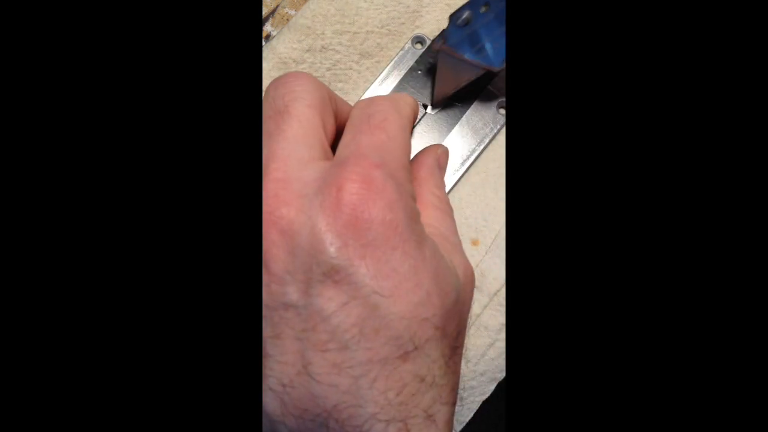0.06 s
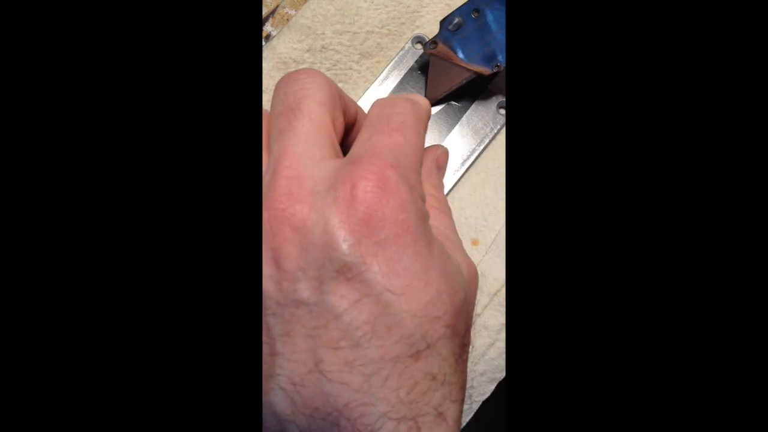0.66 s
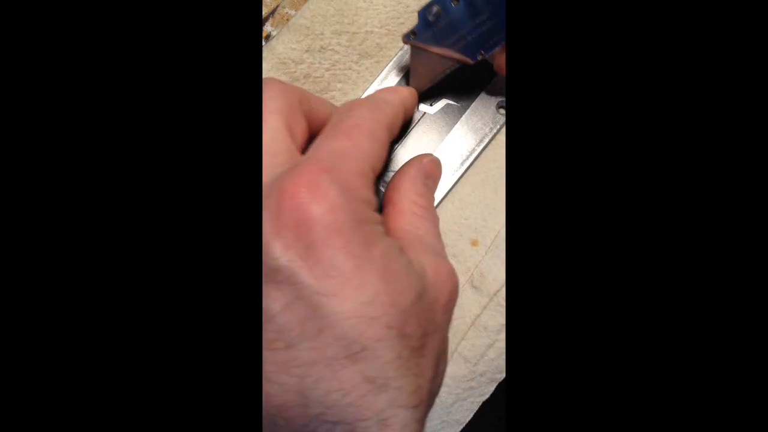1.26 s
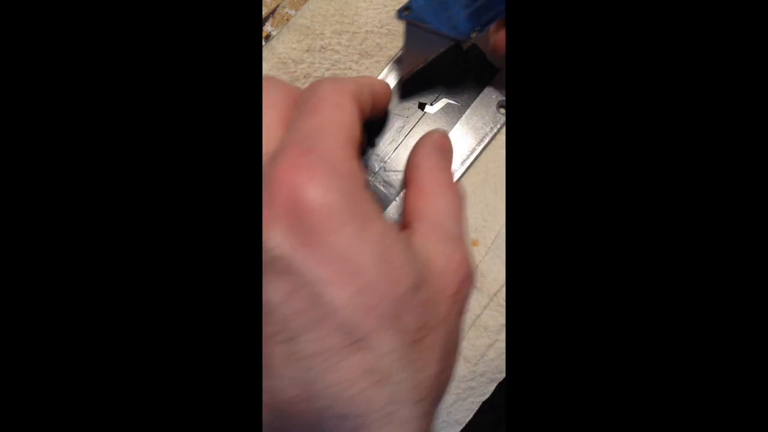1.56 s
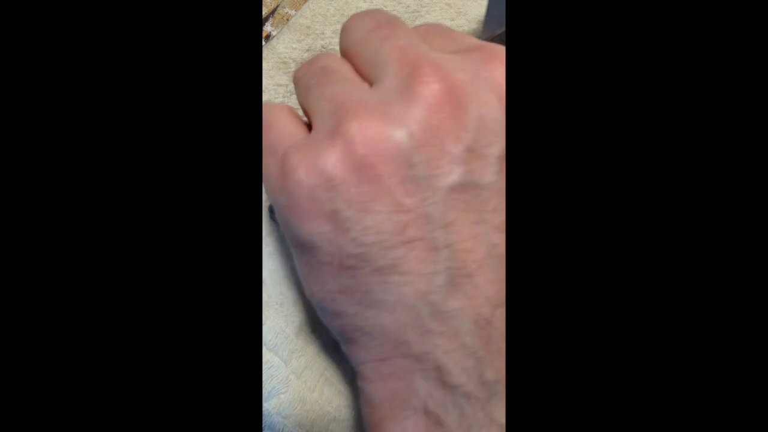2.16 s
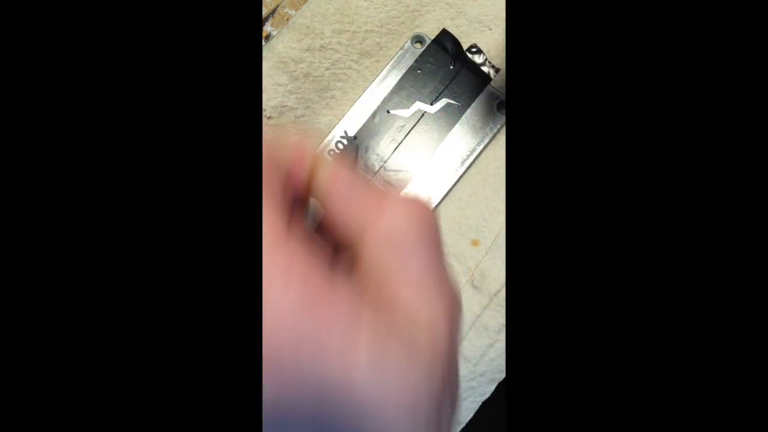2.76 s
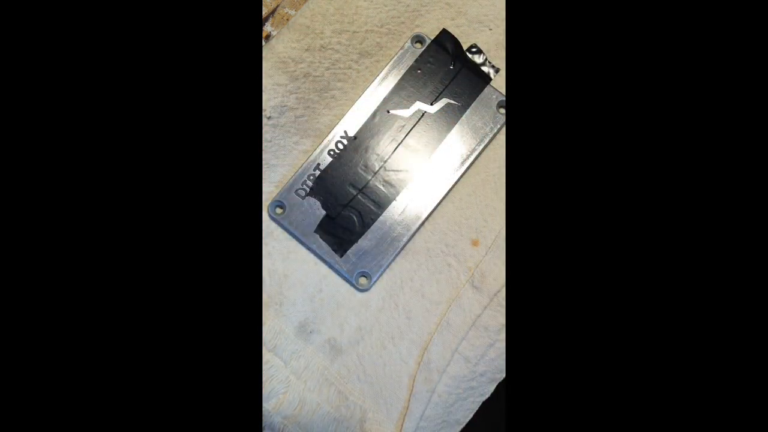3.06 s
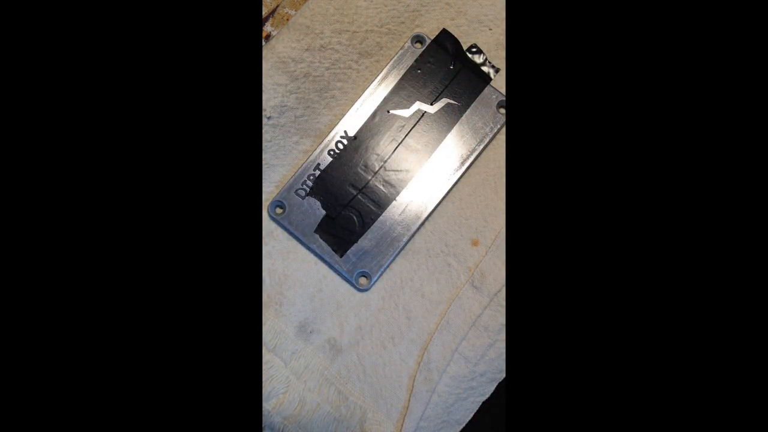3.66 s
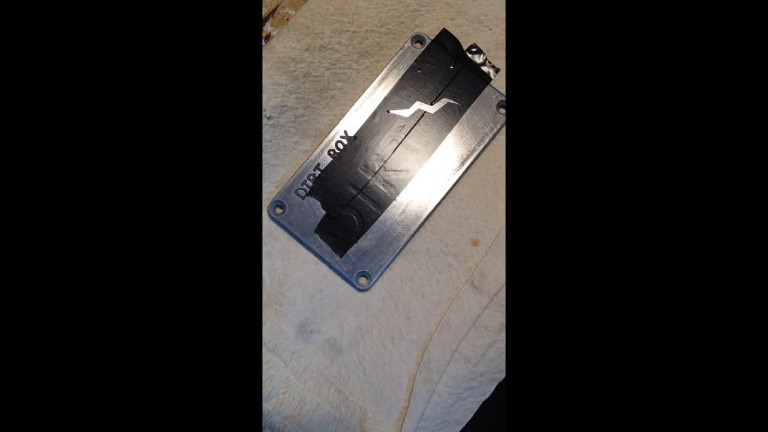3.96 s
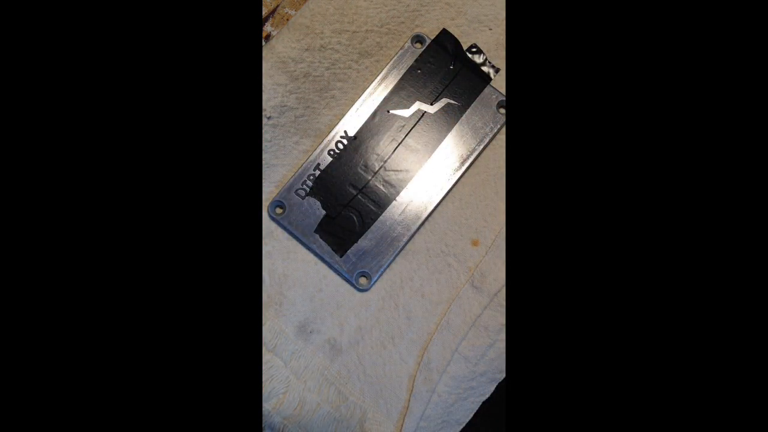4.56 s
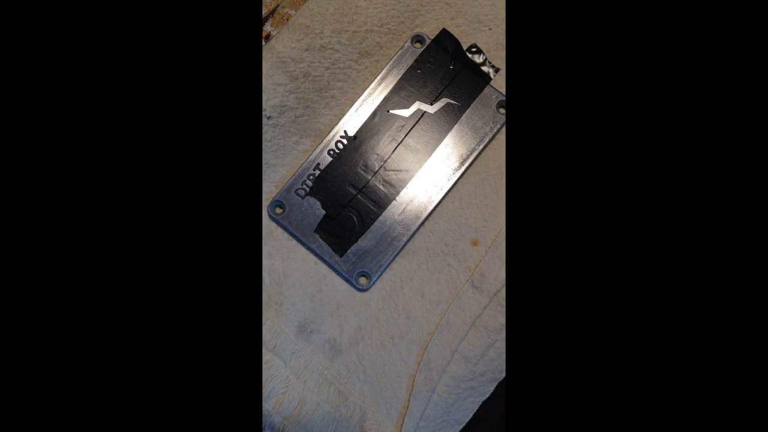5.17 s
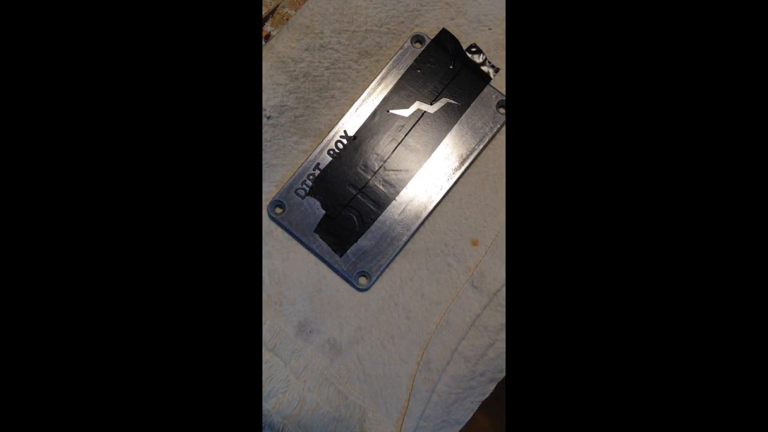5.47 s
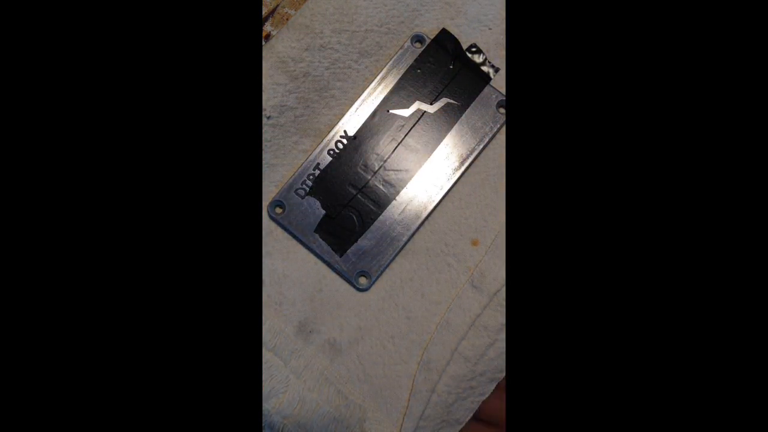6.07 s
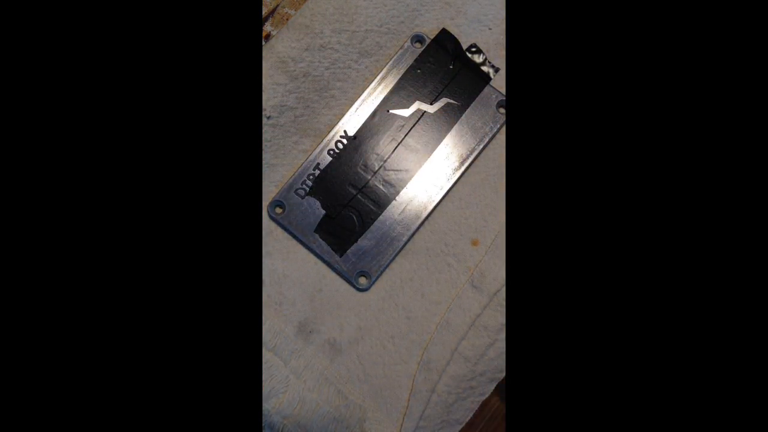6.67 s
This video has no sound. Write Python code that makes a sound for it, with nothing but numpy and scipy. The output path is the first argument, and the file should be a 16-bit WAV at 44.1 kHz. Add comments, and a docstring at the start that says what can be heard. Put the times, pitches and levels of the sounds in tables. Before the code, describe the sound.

A blade faintly nicks tape on a metal plate, then tools clack onto a wooden bench before a close rub and a loud bump.

```python
"""A wooden bench in a quiet room, the microphone of a phone close to the work.
A craft blade nicks tape on a small metal plate, which rings under light taps and scrapes.
Tools clack down, their handles ringing over the thud of the bench. Then comes close handling
at the microphone: a stick-slip rub, a thin squeal, a bump, a short rasp and a faint crackle.
Low room rumble and a wavering drone lie underneath."""
import sys
import numpy as np
from scipy import signal
from scipy.fft import rfft, irfft
from scipy.io import wavfile

SR = 44100
rng = np.random.default_rng(int(sys.argv[2]) if len(sys.argv) > 2 else 0)


def store_pcm(level_fs):
    """Save levels as 16-bit WAV."""
    pcm = np.round(np.clip(level_fs, -1, 1) * 32767).astype(np.int16)
    wavfile.write(sys.argv[1], SR, np.atleast_2d(pcm).T)


N = 300321
TIME = np.arange(N) / SR
AGE = TIME[:SR // 2]  # seconds since a blow

# Spectra of a bright tick, its duller body, a hard crack and a wooden clack.
# Each row: frequency in Hz, level in dB.
TICK_COLOUR = [(1500, -23), (2300, -7), (3200, -8), (5000, -0.5), (6800, -1), (9000, -9), (12500, -5.5),
               (15500, -14.5)]
BODY_COLOUR = [(250, 0.5), (500, -1), (900, -6), (1800, -1), (2800, -11), (5000, -12.5)]
CRACK_COLOUR = [(1000, -23), (2000, 0), (3500, -7), (5000, -0.5), (6500, 1.5), (8500, -5.5), (12000, -11),
                (15500, -11)]
CLACK_COLOUR = [(200, -13), (420, 0.5), (600, 2), (850, 1.5), (1300, -9), (1800, -19.5), (2800, -20)]
# Modes of a steel tool, and of what is bumped close to the microphone.
# Each row: frequency in Hz, level in dB, t60 in seconds.
STEEL_MODES = [(3250, -13, .04), (4860, 0, .042), (5130, -3, .038), (6140, -8, .03), (6850, -2, .034),
               (7120, -6, .036), (9930, -6, .038)]
BUMP_MODES = [(77, -12.5, .22), (123, -12, .17), (199, -9.5, .12), (310, -9, .045), (370, 0, .045),
              (516, -10, .05), (560, -12, .05), (856, -14, .032), (1357, -23, .04)]


def undb(db):
    """Decibels to gain."""
    return 10 ** (np.asarray(db) / 20)


def unit(x):
    """Scale to rms 1."""
    return x / np.sqrt(np.mean(x ** 2))


def add(out, start_s, sound):
    """Mix a sound in at start_s."""
    start = int(start_s * SR)
    out[start:start + len(sound)] += sound[:N - start]


def colour(x, points):
    """Shape x by (Hz, dB) points, falling 30 dB an octave past their ends; rms 1."""
    hz, db = np.transpose(points)
    octave = np.log2(np.maximum(np.fft.rfftfreq(len(x), 1 / SR), 1))
    knots = np.log2(hz)
    outside = np.abs(octave - np.clip(octave, knots[0], knots[-1]))
    gain = undb(np.interp(octave, knots, db) - 30 * outside)
    return unit(irfft(rfft(x) * gain, len(x)))


def walk(rate):
    """Random wander through rate points a second, with a spread near 1."""
    return np.interp(TIME * rate, np.arange(8192), rng.standard_normal(8192))


def decay(t60, hold=0):
    """Steady for hold seconds, then a fall of 60 dB in t60 seconds."""
    return np.exp(-np.log(1000) * np.maximum(AGE - hold, 0) / t60)


def ring(modes, scatter_db=1.5):
    """Damped modes after one blow; their weights change with the spot that is struck."""
    hz, db, t60 = np.transpose(modes)
    weights = undb(db + scatter_db * rng.standard_normal(len(hz))) * (-1) ** np.arange(len(hz))
    partials = (a * np.sin(2 * np.pi * f * AGE) * decay(t) for f, a, t in zip(hz, weights, t60))
    return sum(partials) / np.linalg.norm(weights)


def resonate(x, modes):
    """Drive a set of modes with x; rms 1."""
    return unit(signal.fftconvolve(x, ring(modes, scatter_db=0))[:N])


def burst(points, t60, rise=0.00067, hold=0):
    """A crowd of short-lived resonances, heard as a dying puff of noise."""
    return colour(rng.standard_normal(len(AGE)), points) * decay(t60, hold) * np.clip(AGE / rise, 0, 1)


def friction(rate, spread_db, patchy_db):
    """Tiny stick-slip releases, about rate a second, uneven in size and coming in patches."""
    slips = (rng.random(N) < rate / SR) * rng.choice([-1, 1], N)
    size_db = spread_db * np.minimum(rng.exponential(size=N), 4)
    return unit(slips * undb(size_db + patchy_db * walk(90)))


def stroke(peak_s, db, rise_s, fall_s):
    """Gain of one hand movement: a bell that climbs 20 dB in rise_s and loses it again in fall_s."""
    away = (TIME - peak_s) / np.where(TIME < peak_s, rise_s, fall_s)
    return undb(db - 20 * np.minimum(away ** 2, 9))


def strokes(rows):
    """Gain of a series of hand movements."""
    return sum(stroke(*row) for row in rows)


def room_tone():
    """Room rumble with a low, wavering drone."""
    # Spectrum of the still room. Each row: frequency in Hz, level in dB.
    air_colour = [(25, -27.5), (59, -10), (119, -7), (200, -16), (274, -16), (310, -22), (389, -22),
                  (582, -31), (1570, -39), (3260, -44.5), (15500, -51)]
    drone_hz = 120
    rumble = colour(rng.standard_normal(N), air_colour) * undb(-61.5 + 0.4 * walk(16))
    drone = undb(-64.5 + 1.7 * walk(7.1)) * np.sin(2 * np.pi * drone_hz * TIME)
    return rumble + drone


def room(x):
    """At close range the small room adds only a weak, duller tail; the low middle lingers longest."""
    tail = burst([(80, 11), (600, -1.5), (2500, -2), (15000, -13)], t60=0.15, rise=0.016)
    boom = burst([(200, -9.5), (400, 0.5), (600, -10), (1500, -16.5)], t60=0.4, rise=0.016)
    echo = undb(-22) * tail / np.linalg.norm(tail) + undb(-40) * boom / np.linalg.norm(boom)
    return x + signal.fftconvolve(x, echo)[:N]


def sliding():
    """Light sliding contact gives a faint, fine hiss; each stroke has its own brightness."""
    # Each row: peak time in seconds, level in dB, rise and fall in seconds, relative treble in dB.
    slides = [(1.17, -81, .2, 0.51, 5), (3.1, -74.5, .2, 0.059, 6), (3.187, -71.5, 0.057, 0.091, 6.5),
              (3.4, -69.5, 0.092, 0.15, 5.5), (3.6, -57, 0.11, 0.11, -13.5), (4.1, -66, .14, 0.074, -1),
              (4.25, -66, .1, 0.3, -7.5), (5.02, -70, .1, 0.25, -7)]
    # Spectrum of the hiss. Each row: frequency in Hz, level in dB.
    hiss_colour = [(700, -8), (1800, 2.5), (3000, -4.5), (5800, -1.5), (9000, -5.5), (13000, -4),
                   (15500, -4.5)]
    hiss = colour(friction(rate=13000, spread_db=3.5, patchy_db=3), hiss_colour)
    dull = signal.sosfiltfilt(signal.butter(2, 7000, fs=SR, output="sos"), hiss)
    return sum(stroke(*shape) * (dull + undb(treble_db) * (hiss - dull)) for *shape, treble_db in slides)


def rustle():
    """The last soft strokes of handling crackle faintly."""
    # Each row: peak time in seconds, level in dB, rise and fall in seconds.
    rustles = [(6.113, -58.5, 0.0088, .04), (6.153, -57.5, 0.019, 0.035), (6.252, -58.5, 0.04, 0.041),
               (6.365, -66.5, 0.098, 0.056), (6.63, -67, 0.28, .25)]
    # Spectrum of the rustle. Each row: frequency in Hz, level in dB.
    rustle_colour = [(290, -7), (500, -5), (997, -1), (1820, -6.5), (4020, -13.5), (15500, -16)]
    return strokes(rustles) * colour(friction(rate=12000, spread_db=5, patchy_db=3), rustle_colour)


def handle_clicks():
    """A hollow handle clicks as it is gripped."""
    # Each row: start in seconds, level in dB, relative level of the low modes in dB.
    clicks = [(3.7244, -38.5, -22), (3.988, -35, -0.5), (3.9948, -35.5, -12.5)]
    # Modes of the shell. Each row: frequency in Hz, level in dB, t60 in seconds.
    low_modes = [(1755, 0, .018), (2480, -6, .02), (4350, 0, .02)]
    high_modes = [(6050, -0.5, 0.014), (7300, -0.5, 0.025), (7900, -0.5, .02), (10220, -1, 0.023),
                  (12450, 3, 0.015)]
    out = np.zeros(N)
    for start, db, low_db in clicks:
        shell = ring(high_modes) + undb(low_db) * ring(low_modes)
        contact = undb(-6.5) * burst(TICK_COLOUR, t60=0.04)
        add(out, start, undb(db - 2.5) * (shell + contact))
    return out


def steel_rattle():
    """A steel tool rocks and chatters as it settles."""
    # Each row: start in seconds, level in dB.
    rattles = [(4.137, -45), (4.3745, -42), (4.3815, -46), (4.3855, -35.5)]
    out = np.zeros(N)
    for start, db in rattles:
        chink = ring(STEEL_MODES, scatter_db=3) + undb(-9) * burst(TICK_COLOUR, t60=0.015)
        add(out, start, undb(db - 4) * chink)
    return out


def tool_skid():
    """A tool skids on the wood and judders, drawing a brief note."""
    # Each row: peak time in seconds, level in dB, rise and fall in seconds.
    skids = [(3.598, -48.5, 0.097, 0.089)]
    judders = [(3.606, -46.5, .008, .012), (3.622, -44.5, 0.013, 0.021)]
    # Spectrum of the skid. Each row: frequency in Hz, level in dB.
    skid_colour = [(300, -25), (900, -21.5), (1500, -25.5), (3220, -27.5), (4470, -28.5), (5400, -31.5),
                   (15000, -46.5)]
    # The judder's note. Each row: frequency in Hz, level in dB, t60 in seconds.
    judder_modes = [(792, 8.5, 0.082), (898, 9.5, 0.051), (1195, 4, .03)]
    slips = friction(rate=4800, spread_db=4, patchy_db=0)
    return strokes(skids) * colour(slips, skid_colour) + strokes(judders) * resonate(slips, judder_modes)


def blow(crack_db, thud_db, clack_db, ring_db, pitch=1, clack_pitch=1):
    """A hard contact cracks, the metal handle rings, and the bench answers with a clack and a thud."""
    # Each row: frequency in Hz, level in dB, t60 in seconds.
    bench_modes = [(122, 2, .17), (199, -1.5, .13), (242, -6, .09), (304, -6, .08), (422, -10, .078),
                   (535, -7, .09), (655, -11, .06), (812, -14, .07)]
    handle_modes = [(2080, -6, .03), (2260, -4, .03), (2603, 0, .038), (4240, -6, .028), (4540, -3, .027),
                    (4848, 6, .019), (5160, -2, .022), (5820, -1, .02), (6150, -2, .02), (8570, -11, .02),
                    (12200, -4, .01)]
    # the first instant of contact is the brightest
    edge = undb(0.5) * burst(TICK_COLOUR, t60=0.0047, rise=0.00016)
    crack = edge + undb(-1.5) * burst(CRACK_COLOUR, t60=0.049)
    handle = ring(np.array(handle_modes) * [pitch, 1, 1])
    tool = undb(crack_db) * crack + undb(ring_db + 1.5) * handle
    # a higher-pitched clack dies away sooner
    clack = burst(np.array(CLACK_COLOUR) * [clack_pitch, 1], t60=0.058 / clack_pitch)
    # the heavy bench takes a few milliseconds to get moving
    thud = ring(bench_modes) * np.clip(AGE / 0.0039, 0, 1)
    return tool + undb(clack_db) * clack + undb(thud_db) * thud


def landing_snap():
    """The bright snap of a tool falling flat."""
    # Each row: frequency in Hz, level in dB.
    snap_colour = [(2000, -13.5), (4800, 0), (7000, 0), (9000, -3.5), (12000, 0), (15500, -9)]
    return burst(snap_colour, t60=0.011, rise=0.0002)


def tool_knocks():
    """Light knocks on the bench are single blows; a dropped tool lands on end, falls flat and rebounds."""
    # Each row: start in seconds, crack, thud and clack in dB, pitch ratio of the clack.
    knocks = [(3.2513, -75, -55, -51, 1.17), (3.4982, -58, -50.5, -53, 1.8),
              (3.8145, -44, -39.5, -41.5, 0.91), (4.1288, -70, -52, -39, 0.73),
              (4.331, -60, -40.5, -50, 0.54), (4.373, -52, -35, -32.5, 1.25),
              (4.534, -58.5, -46, -54.5, 0.86), (4.569, -63, -44, -54.5, 0.84),
              (5.034, -71.5, -47.5, -56, 1.3)]
    # Each row: main blow in seconds; crack, thud, clack, ring and bright snap in dB;
    # lead of the first touch in seconds, its crack in dB; pitch ratio of the ring.
    drops = [(3.5439, -27.5, -26.5, -40, -25, -28.5, 0.0052, -25, 1.36),
             (4.1485, -31, -26.5, -29.5, -14, -20, .0128, -46, 1)]
    light_ring_db, touch_bench_db = -9, -2.5
    rebound_s, rebound_tool_db, rebound_bench_db = 0.0116, -11.5, -9.5
    out = np.zeros(N)
    for start, crack, thud, clack, clack_pitch in knocks:
        add(out, start, blow(crack, thud, clack, crack + light_ring_db, clack_pitch=clack_pitch))
    for start, crack, thud, clack, ring_db, snap_db, lead_s, touch, pitch in drops:
        first = blow(touch, thud + touch_bench_db, clack + touch_bench_db, touch + light_ring_db, pitch)
        landing = blow(crack, thud, clack, ring_db, pitch) + undb(snap_db) * landing_snap()
        rebound = blow(crack + rebound_tool_db, thud + rebound_bench_db, clack + rebound_bench_db,
                       ring_db + rebound_tool_db, pitch)
        add(out, start - lead_s, first)
        add(out, start, landing)
        add(out, start + rebound_s, rebound)
    return out


def close_rub():
    """A long rub at the microphone ends in short pushes: friction hisses and catches over a rumble."""
    # Each row: peak time in seconds, friction and rumble in dB, rise and fall in seconds.
    pushes = [(5.375, -43, -35, 0.25, 0.35), (5.428, -56, -34, 0.034, 0.035),
              (5.455, -51, -46.5, 0.02, 0.019), (5.592, -48.5, -32, 0.063, 0.055),
              (5.729, -51, -55.5, 0.058, 0.13)]
    # Spectra of friction and rumble. Each row: frequency in Hz, level in dB.
    rub_colour = [(240, -41.5), (400, -5.5), (760, -3), (942, -3.5), (1220, -7), (3110, -11), (3970, -19),
                  (5910, -20.5), (15500, -39)]
    rumble_colour = [(24, -43), (40, -12.5), (81, -13.5), (119, 3), (156, -11), (219, -6.5), (349, -12),
                     (650, -37.5)]
    # Resonances that the rub picks out. Each row: frequency and width in Hz, level in dB.
    resonances = [(823, 36, 4), (1047, 30, 3), (1440, 70, -16), (2330, 41, -4.5)]
    # Each row: peak time in seconds, level in dB, rise and fall in seconds.
    catches = [(5.32, -52, 0.17, .22), (5.4535, -41, 0.0071, 0.018), (5.539, -49.5, 0.007, 0.015),
               (5.583, -46, .005, 0.026), (5.714, -57.5, .008, 0.022)]
    # What the catches ring. Each row: frequency in Hz, level in dB, t60 in seconds.
    catch_modes = [(2680, 1, 0.014), (3120, 2, 0.013), (3400, -1.5, 0.015), (3643, -1.5, 0.025),
                   (4570, -3.5, 0.014), (5900, -2.5, 0.0053)]
    hand_contact_s = 5.115
    fine = friction(rate=5900, spread_db=2, patchy_db=0.9)
    grain = fine + undb(-6.5) * friction(rate=300, spread_db=4, patchy_db=1)
    body = resonate(grain, [(hz, db, np.log(1000) / (np.pi * width)) for hz, width, db in resonances])
    hiss = colour(grain, rub_colour) + undb(-11) * body
    rub = hiss * sum(stroke(peak, db, rise, fall) for peak, db, _, rise, fall in pushes)
    judder = colour(friction(rate=2400, spread_db=1.5, patchy_db=2), rumble_colour)
    rumble = judder * sum(stroke(peak, db, rise, fall) for peak, _, db, rise, fall in pushes)
    grit = strokes(catches) * resonate(friction(rate=350, spread_db=0.5, patchy_db=2), catch_modes)
    return (rub + rumble + grit) * (TIME > hand_contact_s)


def squeal():
    """Friction close to the microphone squeals thinly, with two short chirps."""
    # Each row: peak time in seconds, level in dB, rise and fall in seconds.
    swells = [(5.775, -53, 0.07, .04)]
    # Each row: start in seconds, level in dB.
    chirps = [(5.757, -38.5), (5.784, -36)]
    # Spectrum of both. Each row: frequency in Hz, level in dB.
    squeal_colour = [(5000, -20.5), (6600, -7), (7400, 9.5), (8500, -3.5), (11000, -7.5), (15000, -14)]
    out = strokes(swells) * colour(friction(rate=8200, spread_db=0.5, patchy_db=3), squeal_colour)
    for start, db in chirps:
        add(out, start, undb(db) * burst(squeal_colour, t60=0.085, rise=0.0016))
    return out


def rasp():
    """A short rasp of close handling; its slips keep shaking what was bumped."""
    # Each row: peak time in seconds, level in dB, rise and fall in seconds.
    rasps = [(5.808, -40, 0.023, 0.017), (5.846, -25, 0.04, 0.04), (5.882, -53, .03, 0.029)]
    shakes = [(5.838, -23, 0.053, 0.047)]
    # Spectrum of the rasp. Each row: frequency in Hz, level in dB.
    rasp_colour = [(260, -9), (450, 0.5), (1060, -5.5), (1730, -1), (2100, -10.5), (4090, -11.5),
                   (10900, -23), (15500, -22.5)]
    slips = friction(rate=9000, spread_db=3, patchy_db=3)
    return strokes(rasps) * colour(slips, rasp_colour) + strokes(shakes) * resonate(slips, BUMP_MODES)


def bump():
    """A soft bump close to the microphone and two small ones as it settles: low modes and a dull smack."""
    # Each row: start in seconds, level in dB.
    bumps = [(5.7902, -4), (5.933, -36.5), (5.992, -46)]
    out = np.zeros(N)
    for start, db in bumps:
        thump = ring(BUMP_MODES, scatter_db=3) + undb(-15) * burst(CLACK_COLOUR, t60=0.054)
        add(out, start, undb(db) * thump)
    return out


def plate():
    """Taps and the dragging blade excite the same modes of the plate, which the bench damps."""
    # Each row: frequency in Hz, level in dB, t60 in seconds.
    plate_modes = [(1606, 0, 0.046), (1660, 1.5, 0.0076), (2830, -14.5, 0.04), (3520, -1.5, 0.04),
                   (5440, -9, 0.02), (5390, -12, 0.021), (5910, -13, 0.035), (6470, -12, 0.023),
                   (7700, -16, 0.053), (9260, -15.5, 0.047), (10470, -17, .028), (12000, -9, 0.023)]
    # Each row: start in seconds, level in dB, trim of the ring in dB.
    taps = [(1.799, -56, -18), (1.8902, -53.5, -19), (1.9897, -54, -13), (2.312, -44.5, -22),
            (2.38, -39, -17), (2.3956, -41.5, -21), (2.453, -46, -7), (2.6371, -42.5, 5)]
    # Each row: peak time in seconds, level in dB, rise and fall in seconds.
    drags = [(2.04, -77.5, 0.086, 0.48), (2.48, -70.5, 0.062, 0.13), (2.589, -66.5, 0.049, .016)]
    # Spectrum of the scrape. Each row: frequency in Hz, level in dB.
    drag_colour = [(900, 2), (3000, -6), (5400, 1.5), (14500, -7)]
    scrape = colour(friction(rate=770, spread_db=3, patchy_db=3), drag_colour)
    out = strokes(drags) * (undb(-2.5) * resonate(scrape, plate_modes) + undb(-9.5) * scrape)
    for start, db, ring_db in taps:
        click = undb(-17) * burst(CRACK_COLOUR, t60=0.013, rise=0.00046)
        body = undb(-7.5) * burst(BODY_COLOUR, t60=0.02)
        add(out, start, undb(db) * (click + body + undb(ring_db + 5.5) * ring(plate_modes)))
    return out


def ticks():
    """Small bright snaps, blade nicks at first and later clicks of handling: crack, tone, ring, body."""
    # Each row: start in seconds, level in dB, trim of the body in dB, hold in seconds, pitch in Hz.
    snaps = [(0.302, -49.5, -27, 0.0077, 7700), (0.316, -38.5, -32, 0.0023, 5900),
             (0.41, -58.5, -5, 0.0035, 3180), (0.4676, -41.5, -35, 0.016, 3230),
             (0.711, -46, -15, 0.00037, 7570), (1.343, -49.5, -27, 0, 10700),
             (1.6132, -55.5, -28, 0.0036, 4900), (3.6505, -35, -15, 0, 4050),
             (3.8457, -43.5, -5, 0.0051, 7130), (5.0502, -48, 5, 0.012, 1790),
             (5.117, -61.5, 14.5, 0.011, 1770), (5.441, -39.5, -26, 0.017, 2800),
             (5.5795, -28, -14.5, 0.00065, 3500), (5.672, -53.5, 9.5, 0.012, 1800),
             (6.2471, -42.5, -22, 0.0034, 7750), (6.3315, -45, -16, 0, 4970),
             (6.3611, -41.5, -2, 0.0025, 1470), (6.3882, -38.5, -10, 0, 10550),
             (6.4058, -42.5, -5, 0.0011, 5770)]
    crack_t60, tone_t60 = 0.015, 0.022  # seconds
    out = np.zeros(N)
    for start, db, body_db, hold_s, hz in snaps:
        # the steely ring shifts a little in pitch from snap to snap
        detune = 1 + 0.025 * rng.standard_normal()
        steel = undb(-17) * ring(np.array(STEEL_MODES) * [detune, 1, 1], scatter_db=3)
        tone = undb(2.5) * np.sin(2 * np.pi * hz * AGE) * decay(tone_t60 + hold_s)
        crack = burst(TICK_COLOUR, crack_t60, hold=hold_s)
        snap = undb(-12.5) * (crack + steel + tone)
        body = undb(body_db - 8.5) * burst(BODY_COLOUR, 2.1 * crack_t60, hold=hold_s)
        add(out, start, undb(db) * (snap + body))
    return out


def scene():
    """All the handwork at the bench, in mono, over the room tone."""
    fine_work = ticks() + plate()
    tools = tool_knocks() + tool_skid() + handle_clicks() + steel_rattle()
    handling = sliding() + close_rub() + squeal() + rasp() + rustle() + bump()
    return (room(fine_work + tools + handling) + room_tone())[None]


def record(dry):
    """The phone thins the deep bass and cuts the top."""
    bass_hz, top_hz = 42, 15300
    thin = signal.sosfilt(signal.butter(3, bass_hz, "high", fs=SR, output="sos"), dry)
    return signal.sosfilt(signal.ellip(10, 0.2, 70, top_hz, fs=SR, output="sos"), thin)


dry = scene()
out = record(dry)
store_pcm(out)
```